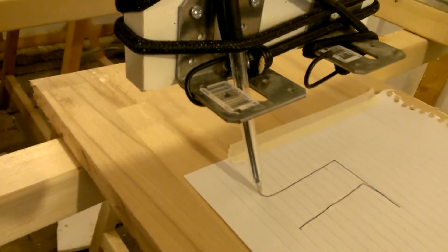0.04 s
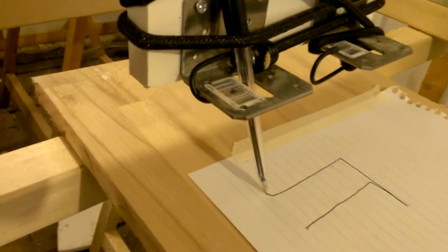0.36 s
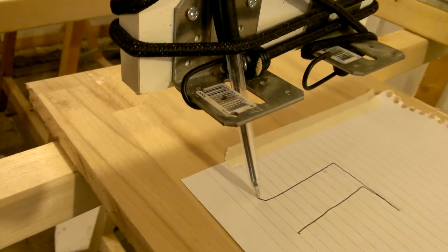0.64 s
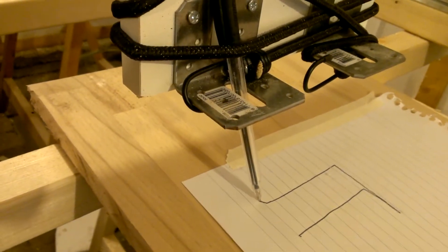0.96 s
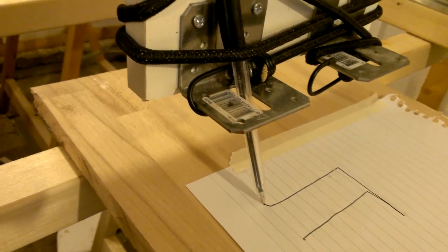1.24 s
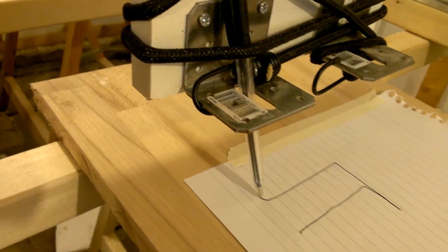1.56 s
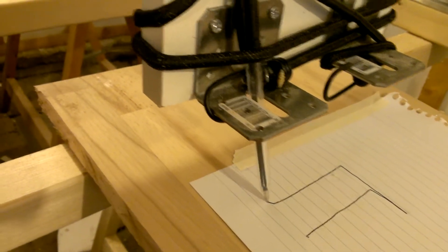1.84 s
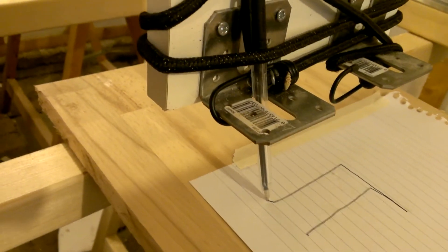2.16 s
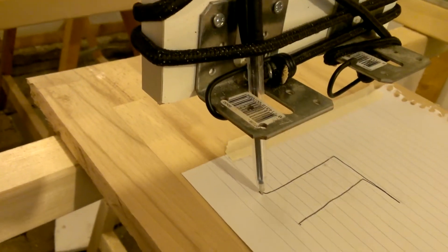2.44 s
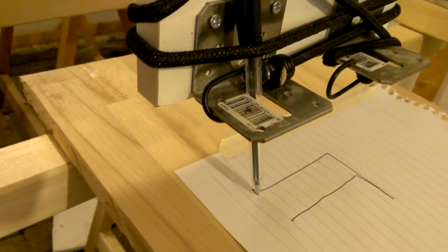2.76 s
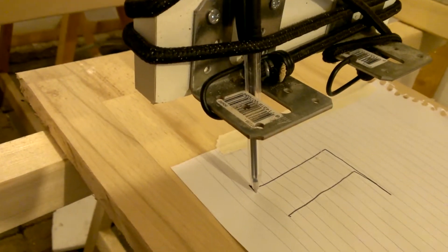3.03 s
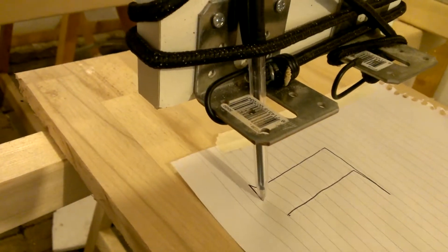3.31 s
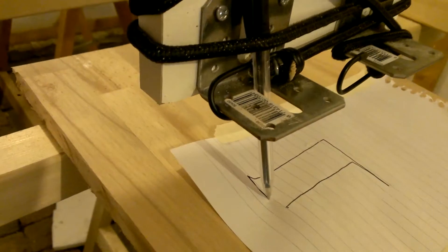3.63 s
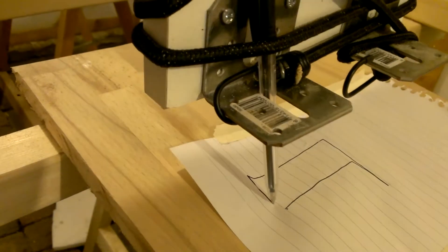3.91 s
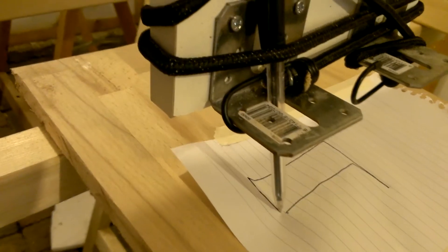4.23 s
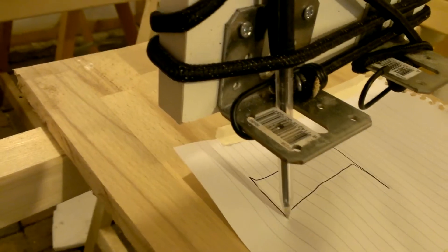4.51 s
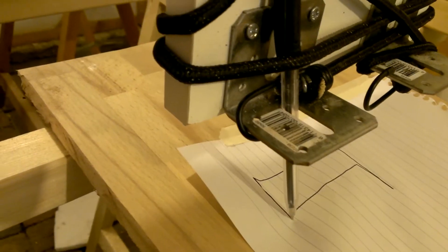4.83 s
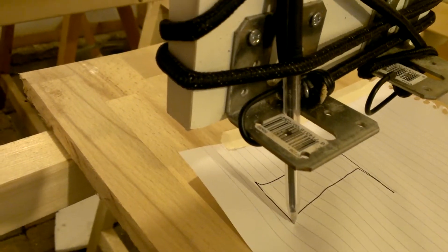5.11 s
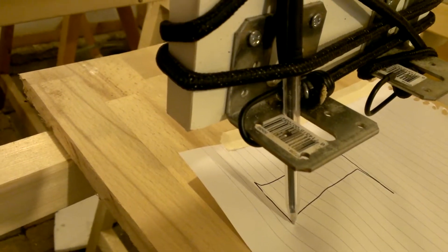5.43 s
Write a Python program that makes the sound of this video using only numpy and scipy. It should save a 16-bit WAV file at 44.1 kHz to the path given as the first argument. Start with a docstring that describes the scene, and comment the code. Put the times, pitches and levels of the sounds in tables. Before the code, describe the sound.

A small stepper motor drives a plotter on a wooden bench, heard from close up over faint room hiss. A short rattling stop and a pause come first, then two back-to-back runs of even, singing whir with belt noise, the frame juddering at each start and stop. One bright metallic snap rings out early in the second run. Afterwards a thin coil whine cuts off and the carriage bumps softly.

```python
"""In a workshop, close by, a homemade plotter on a wooden bench ends one stroke and draws two more. Its stepper
motor turns in tiny jumps: they shake the frame at each start and stop, and blend into a steady song at full
speed, over the rush of belt and bearings. A sharp snap rings out after the plotter reverses. At rest the
motor's coils whine until the current drops and the carriage (the part that carries the pen) settles with soft
bumps. Behind it all is the faint hiss of the room."""
import sys
import numpy as np
from scipy import signal
from scipy.fft import rfft, irfft
from scipy.io import wavfile

SR = 44100
rng = np.random.default_rng(int(sys.argv[2]) if len(sys.argv) > 2 else 0)


def digitize_waveform(pressure):
    """Quantize a signal to 16-bit integers and store it at the path in sys.argv[1].

    Rows of a 2-D input are taken as channels; values are limited to [-1, 1].
    """
    field = np.atleast_2d(pressure).T
    bounded = np.clip(field, -1, 1)
    quanta = np.round(bounded * 32767).astype(np.int16)
    wavfile.write(sys.argv[1], SR, quanta)


N = 250047
TIME = np.arange(N) / SR
FULL_SPEED, STEPS_PER_TURN = 824.66, 200   # speeds are in motor steps per second

# Pen strokes, the first already ending: start_s, brake_s, stop_s, shake_db, resting_whine_db
STROKES = [(-1, -.095, .072, -8, 1.5), (1.265, 2.885, 3.036, 0, 1), (3.04, 4.606, 4.808, 0, -3)]
# One moment per whole stroke when the motor's once-a-turn swell peaks; the rush rises around it: time_s
SWELL_MOMENTS = [1.5, 3.785]


def motor(speed, steps, shake_db, buzz_db=-45, full_speed_rush_db=-4.6, stagger_steps=2.1):
    """The motor sings once it is up to speed; belt and bearings rush, brighter as it goes faster."""
    # Noise of the belt and bearings: pitch_hz, level_db
    rush_spectrum = [(40, -20.5), (80, -19), (130, -8), (240, -1.5), (550, 0), (900, -4.5), (1400, -6),
                     (2100, -14), (3600, -17.5), (5000, -11.5), (6500, -18), (8500, -24.5), (12000, -30),
                     (16000, -33.5)]
    pace = speed / FULL_SPEED
    steady = np.clip(np.minimum(pace, lowpass(pace, hz=9, order=1)), 0, 1)
    rotor_steps = steps + stagger_steps * (1 - pace) * drift(250)   # it staggers below full speed
    turns = rotor_steps / STEPS_PER_TURN
    angle = shaft_angle(turns)
    load = 1 + .19 * np.cos(angle)
    hum = steady ** 6 * motor_tones(rotor_steps, angle)
    song = pace ** 5 * (case_tones(angle) + from_db(buzz_db) * load * microstep_buzz(turns))
    bright = noise(rush_spectrum)
    dull = lowpass(bright, hz=1600, order=1)
    rush = dull + (bright - dull) * (.41 + .59 * pace)
    rush_gain = rolling_gain(speed, shake_db) * from_db(full_speed_rush_db * steady) * load
    return hum + song + rush_gain * rush


def motor_tones(steps, angle, waver_rate=35, flutter=.33, belt_wander=.065):
    """The motor's pull ripples and makes tones; the changing load makes them swell and waver."""
    # Tones of the eight-step drive pattern:
    # harmonic, level_db, swell_once_a_turn, swell_twice_a_turn, waver_radians
    tones = [(1, -55, .1, -0.72, .4), (2, -42, .27, 0.54, 0.86), (3, -44.5, .3, 0.33, 0.43),
             (4, -42, 0.52, .1, 0.56), (5, -46.5, .1, .2, 1.1), (6, -54.5, .1, .1, 1.7),
             (7, -42.5, 0.3, -.6, .35), (8, -28.5, 0.041, 0, .11), (9, -46.5, .2, .1, .7),
             (10, -52, 0.17, -0.099, 1.4), (11, -59.5, 0.17, -0.2, 0.8), (14, -54.5, .3, 0.4, 1.3),
             (15, -49, .3, -0.1, .25), (16, -45, 0.6, -0.25, .12), (17, -51.5, .4, 0, .4)]
    # Tones of the belt at full speed: pitch_hz, level_db
    belt_tones = [(238, -53.5), (598, -54), (1216.4, -44), (1361.6, -55), (1384, -59), (1712, -59.5)]
    pattern_cycles = steps / 8
    each_turn, each_half_turn = np.cos(angle), np.cos(2 * angle)
    out = np.zeros(N)
    for harmonic, db, once, twice, waver in tones:
        unsteady = drift(waver_rate)
        swell = 1 + once * each_turn + twice * each_half_turn
        swell += flutter * waver * unsteady + .15 * drift(11)
        rocking = waver * (sine(angle / np.pi + rng.random()) / np.sqrt(2) + .83 * unsteady)
        tone = sine(harmonic * pattern_cycles + rng.random() + rocking / (2 * np.pi))
        out += from_db(db) * rms_one(swell) * tone
    for hz, db in belt_tones:
        out += from_db(db) * sine(hz * steps / FULL_SPEED + belt_wander * drift(waver_rate))
    return out


def case_tones(angle, boost_db=1.5, flutter=.2, wander=.05, coil_ring_hz=9400):
    """The motor's case rings at overtones of the full-speed drive pattern."""
    # Ringing of the case, each row moved to the nearest overtone: rough_pitch_hz, relative_db
    tones = [(2471, -58.5), (2885, -63), (3300, -69.5), (3505, -70.5), (3919, -59.5), (4328, -50),
             (4436, -59.5), (4533, -66), (4640, -54.5), (4743, -49.5), (5050, -53.5), (5157, -52),
             (5464, -58), (5959, -67.5), (6083, -61.5), (6185, -67.5), (6907, -64), (7730, -67.5),
             (8554, -69.5), (8662, -71), (9281, -68.5), (9383, -69.5), (9485, -68.5), (9582, -71),
             (10207, -64.5), (11030, -52.5), (11133, -66.5), (11854, -78), (13916, -81), (14739, -74)]
    pattern_hz = FULL_SPEED / 8
    wobbles = [drift(11) for _ in range(7)]
    once_a_turn = .4 * np.cos(angle) - .3
    twice_a_turn = .54 * (1 + np.cos(2 * angle))
    out = np.zeros(N)
    for k, (hz, db) in enumerate(tones):
        overtone_hz = np.round(hz / pattern_hz) * pattern_hz
        tone = sine(overtone_hz * TIME + rng.random() + wander * wobbles[(k + 2) % 7])
        # low overtones swell; those near the coils' own ringing pitch throb twice as fast
        swell = once_a_turn if hz < 3600 else twice_a_turn if abs(hz - coil_ring_hz) < 300 else 0
        out += from_db(db + boost_db) * tone * (1 + swell + flutter * wobbles[k % 7])
    return out


def microstep_buzz(turns, side_tone_db=-13, uneven_db=3, size=65536):
    """Each step is split into finer ones that buzz; the turning shaft adds tones beside each overtone."""
    # Tone colour of the buzz at full speed: pitch_hz, level_db
    buzz_spectrum = [(500, 1), (1100, 8.5), (2000, -4), (3200, -1), (3700, -3.5), (4800, -8), (6200, 0.5),
                     (7500, -20), (9000, -17), (10000, -23.5), (11200, -19.5), (12000, -29), (16000, -28)]
    cycles_per_turn = np.arange(size // 16)
    off_overtone = np.abs((cycles_per_turn + 12) % 25 - 12)   # the pattern repeats 25 times a turn
    gains = gain_at(buzz_spectrum, cycles_per_turn * FULL_SPEED / STEPS_PER_TURN)
    gains *= from_db(side_tone_db * np.sqrt(off_overtone) + uneven_db * rng.standard_normal(len(gains)))
    phases = np.exp(2j * np.pi * rng.random(len(gains)))
    one_turn = irfft(gains * (cycles_per_turn > 110) * phases, size)
    return np.interp(turns % 1 * size, np.arange(size), rms_one(one_turn))


def drive(creep_speed=122, speed_up_per_s=8400, slow_down_per_s=7100, lead_in_s=.027, ease_s=.014):
    """Speed and shaking level: each stroke creeps off, speeds up, holds, brakes and creeps to a stop."""
    hold_s, fade_db_per_s = .035, 140   # after braking, the shaking holds briefly and then fades
    speed, shake_db = np.zeros(N), np.zeros(N)
    for start, brake, stop, db, _ in STROKES:
        until_creep_s = brake + (FULL_SPEED - creep_speed) / slow_down_per_s - TIME
        rising = speed_up_per_s * np.maximum(TIME - start - lead_in_s, 0)
        falling = slow_down_per_s * ease_s * np.logaddexp(0, until_creep_s / ease_s)
        moving = (TIME >= start) & (TIME < stop)
        speed += moving * np.minimum(creep_speed + np.minimum(rising, falling), FULL_SPEED)
        shake_db += moving * (db - fade_db_per_s * np.maximum(-until_creep_s - hold_s, 0))
    return speed, shake_db


def shaft_angle(turns):
    """The shaft's angle in radians, counted from the swell moment of each whole stroke."""
    first, second = np.interp(SWELL_MOMENTS, TIME, turns)
    return 2 * np.pi * (turns - np.where(TIME < STROKES[-1][0], first, second))


def rolling_gain(speed, shake_db, roll_db=-35.5, rotor_hz=200, shudder_db=5, rise_db=3, rise_s=.14):
    """The rush rises at the swell moments, and when steps match the rotor's wobble and it shudders."""
    octaves_away = np.log2((speed + 1e-9) / rotor_hz)
    shudder = np.exp(-(octaves_away / .7) ** 2)
    rise = sum(np.exp(-((TIME - s) / rise_s) ** 2) for s in SWELL_MOMENTS)
    level_db = roll_db + shake_db + shudder_db * shudder + rise_db * rise
    speed_gain = (speed > 0) * (speed / FULL_SPEED + 1e-9) ** .12   # a little louder when faster
    return limit_fall(from_db(level_db) * speed_gain, db_per_s=600)


def judder(speed, steps, shake_db, jolt_db=-29, pull_db=3.5, fast_db=-4, uneven_db=3, rattle_db=-1):
    """Below full speed, uneven steps and knocks make the frame ring and rattle, and the motor growls."""
    # Ringing of the frame and bench: pitch_hz, level_db, ring_s
    frame_modes = [(183, -20, .09), (367, -7, .045), (362.3, -11, 0.2), (440, -7, .02), (527, -8, .04),
                   (505, -13, .18), (640, -11.5, 0.042), (820, -7.5, .025), (1080, -29, 0.022),
                   (1280, -19, .03), (1560, -34, .02), (1940, -33.5, .02)]
    # How loud the growl is at each speed: steps_per_s, level_db
    growl_levels = [(100, -57.5), (270, -37.5), (350, -24.5), (480, -30), (600, -40), (760, -38.5),
                    (824, -40)]
    pace = speed / FULL_SPEED
    slow = np.clip((FULL_SPEED - speed) / 60, 0, 1)
    shaking = np.maximum(slow, lowpass(slow, hz=6, order=1)) * (speed > 0)
    rotor_steps = steps + .55 * pace * drift(300)
    new_step = np.diff(np.floor(np.maximum.accumulate(rotor_steps)), prepend=0) > 0
    pulling_away = sum((TIME >= start) & (TIME < brake) for start, brake, *_ in STROKES) * (1 - pace)
    step_db = jolt_db + shake_db + pull_db * pulling_away + fast_db * pace
    jolts = new_step * shaking * from_db(step_db + uneven_db * rng.standard_normal(N))
    force = jolts + knocks()
    rattle = lowpass(signal.fftconvolve(force, dying_noise(ring_s=.025))[:N], hz=2200)
    speeding_up = lowpass(np.gradient(speed) > 0, hz=100)
    growl_db = np.interp(speed, *np.transpose(growl_levels)) - 5 * speeding_up   # louder when braking
    growl = shaking * from_db(growl_db) * sine(rotor_steps) * (1 + .8 * drift(200))
    return ring(force, frame_modes) + from_db(rattle_db) * rattle + growl


def knocks(gap_s=.0058, soft_hz=2800):
    """Slack in the drive knocks softly in short, fading runs, once for each wobble of the rotor."""
    # Runs of knocks: start_s, level_db, length_s
    runs = [(.001, -25, .011), (1.2985, -14.5, .016), (2.9802, -13.5, .012), (3.067, -12.5, .016),
            (3.1015, -23, .005), (4.699, -16.5, .026)]
    force = np.zeros(N)
    for start, db, length in runs:
        delays = np.arange(0, length, gap_s)
        force += strikes([(start + t, db + 20 * np.log10(1 - (t / length) ** 2 + 1e-9)) for t in delays])
    return lowpass(force, soft_hz)


def snap(tick_db=6, crack_db=16, tail_db=17, ring_db=-5.5):
    """A sharp snap: a bright tick, a crack, ringing, and a tail from the parts around it."""
    # The snap and its rattle: start_s, level_db
    hits = [(3.1726, -8), (3.1748, -18.5), (3.287, -34)]
    # Ringing of the snapping part: pitch_hz, level_db, ring_s
    snap_modes = [(404, -13, 0.12), (1000, -13.5, 0.073), (1350, -12, 0.024), (1680, -8.5, 0.053),
                  (2310, -9, 0.076), (2751, -12.5, 0.13), (3990, -10.5, .03), (3980, 2, 0.012),
                  (4926, -4, 0.044), (5351, -10, .05), (6120, -6.5, .07), (7200, -16, .05)]
    force = strikes(hits)
    tick = from_db(tick_db) * dying_noise(ring_s=.0027)
    crack = from_db(crack_db) * dying_noise(ring_s=.022)
    tail = from_db(tail_db) * dying_noise(ring_s=.22)
    body = signal.sosfilt(signal.butter(3, [1150, 7000], "band", fs=SR, output="sos"), crack + tail)
    return signal.fftconvolve(force, tick + body)[:N] + from_db(ring_db) * ring(force, snap_modes)


def coils(speed, hiss_db=-61, jitter=.35, full_speed_db=-19, flare_s=.008):
    """Current switched rapidly on and off makes the coils whine, mostly while standing or creeping."""
    # Tones of the whine: pitch_hz, level_db
    whine_tones = [(6885, -82), (8699, -77), (9206, -62), (9421, -74), (9634, -75), (11024, -70.5)]
    # Hiss around those tones: pitch_hz, level_db
    hiss_spectrum = [(3000, -25), (6000, -17.5), (8000, -14.5), (8900, -12.5), (9150, -5.5), (9400, 0),
                     (9650, -5), (9850, -14), (10400, -21), (11050, -13), (11500, -25.5), (16000, -25)]
    # Brief flares of the whine at low speed: peak_s, level_db
    flare_peaks = [(1.269, 8), (2.985, 18), (3.053, 11)]
    tones = sum(from_db(db) * sine(hz * TIME + jitter * drift(60) / (2 * np.pi))
                for hz, db in whine_tones)
    flares = sum(from_db(db) * np.exp(-((TIME - s) / flare_s) ** 2) for s, db in flare_peaks)
    gain = limit_fall(whine_gain(), db_per_s=550) + flares
    gain *= from_db(full_speed_db * speed / FULL_SPEED)
    return gain * (tones + from_db(hiss_db) * noise(hiss_spectrum))


def whine_gain(moving_db=3, idle_delay_s=.352):
    """The whine is on from the start of a stroke until the current drops, a moment after the stop."""
    gain = np.zeros(N)
    for start, _, stop, _, rest_db in STROKES:
        gain[(TIME >= start) & (TIME < stop)] = from_db(moving_db)
        gain[(TIME >= stop) & (TIME < stop + idle_delay_s)] = from_db(rest_db)
    return gain


def settle(bump_db=-50.5, gap_s=.012, peak_s=.027, slope_db_per_s=130, count=6):
    """When the current drops the motor lets go; the carriage sinks back in bumps that swell and die."""
    # Ringing of the carriage: pitch_hz, level_db, ring_s
    carriage_modes = [(172.7, 1, 0.22), (196, -7, 0.16), (256.6, 7, 0.082), (392, 7.5, 0.027),
                      (603, -2, 0.061), (763, -6.5, .07), (974, -12, .06), (1280, -10, 0.052)]
    powered = whine_gain() > 0
    bumps = []
    for drop_s in TIME[1:][powered[:-1] & ~powered[1:]]:
        gaps = gap_s * (1 + .3 * rng.uniform(-1, 1, count))
        delays = np.cumsum(gaps) - gaps[0]
        bumps += [(drop_s + t, bump_db - slope_db_per_s * abs(t - peak_s)) for t in delays]
    return ring(lowpass(strikes(bumps), hz=1100, order=3), carriage_modes)


def workshop(sound, echo_db=-13, ring_s=.3, wall_hz=4000):
    """The walls add a short, dull echo that arrives just after the direct sound."""
    tail = np.concatenate([np.zeros(SR // 150), lowpass(dying_noise(ring_s), wall_hz)])
    return sound + from_db(echo_db) * signal.fftconvolve(sound, tail)[:N]


def room_air(level_db=-66):
    """The still air of the workshop is a faint, even hiss."""
    # Tone colour of the air: pitch_hz, level_db
    air_spectrum = [(30, -12.5), (70, -26.5), (150, -13), (230, -2.5), (400, -8), (600, -13), (1000, -13.5),
                    (1200, -18.5), (2500, -20.5), (4500, -16), (7000, -22.5), (16000, -21.5)]
    return from_db(level_db) * noise(air_spectrum)


def from_db(db):
    """Turn decibels into a factor to multiply by."""
    return 10 ** (np.asarray(db) / 20)


def rms_one(x):
    """Scale a signal so that its average strength (rms) is 1."""
    return x / np.sqrt(np.mean(np.abs(x) ** 2) + 1e-20)


def sine(cycles):
    """A pure tone of strength 1, from a running count of its cycles."""
    return np.sqrt(2) * np.sin((2 * np.pi * (cycles - np.floor(cycles))).astype(np.float32))


def gain_at(spectrum, hz):
    """The gain at any pitch, read between rows of pitch_hz, level_db."""
    pitches, db = np.transpose(spectrum)
    return from_db(np.interp(np.log(hz + 1e-9), np.log(pitches), db))


def noise(spectrum):
    """Noise of strength 1 with the given tone colour."""
    hz = np.arange(N // 2 + 1) * SR / N
    return rms_one(irfft(rfft(rng.standard_normal(N)) * gain_at(spectrum, hz), N))


def dying_noise(ring_s):
    """Half a second of noise, total energy 1, that falls 60 dB in ring_s."""
    t = TIME[:SR // 2]
    tail = rng.standard_normal(len(t)) * from_db(-60 * t / ring_s)
    return tail / np.linalg.norm(tail)


def drift(rate):
    """A random wander of strength 1 that heads for a new value `rate` times a second."""
    targets = rng.standard_normal(1024)
    return rms_one(np.interp(TIME * rate, np.arange(len(targets)), targets))


def strikes(rows):
    """One click for each row of start_s, level_db."""
    start_s, db = np.transpose(rows)
    clicks = np.zeros(N)
    clicks[np.clip(np.round(start_s * SR).astype(int), 0, N - 1)] = from_db(db)
    return clicks


def ring(force, modes):
    """A struck object rings at its own pitches (modes), each falling 60 dB in its ring_s."""
    out = np.zeros(N)
    for hz, db, ring_s in modes:
        decay, phase_step = from_db(-60 / (ring_s * SR)), 2 * np.pi * hz / SR
        feedback = [1, -2 * decay * np.cos(phase_step), decay * decay]
        out += signal.lfilter([0, from_db(db) * np.sin(phase_step)], feedback, force + 1e-18)
    return out


def limit_fall(gain, db_per_s):
    """Let a gain rise at once but fall no faster than db_per_s."""
    fall = db_per_s * TIME
    return from_db(np.maximum.accumulate(20 * np.log10(gain + 1e-9) + fall) - fall)


def lowpass(x, hz, order=2):
    """Soften everything above hz."""
    return signal.sosfilt(signal.butter(order, hz, fs=SR, output="sos"), x + 1e-18)


def highpass(x, hz, order=2):
    """Thin out everything below hz."""
    return signal.sosfilt(signal.butter(order, hz, "high", fs=SR, output="sos"), x)


def scene():
    """The motor, the shaken frame with its echo, the coils and the quiet room, in one channel."""
    speed, shake_db = drive()
    steps = np.cumsum(speed) / SR
    blows = judder(speed, steps, shake_db) + snap() + settle()
    blows = highpass(blows, hz=153, order=3)   # the small frame gives off little bass
    return (motor(speed, steps, shake_db) + workshop(blows) + coils(speed) + room_air())[None]


def record(dry, peak_limit=.48, bass_cut_hz=65, treble_cut_hz=15750):
    """A small microphone rounds the highest peaks and loses the deep bass and the very top."""
    rounded = dry / (1 + (dry / peak_limit) ** 6) ** (1 / 6)
    thin = highpass(rounded, bass_cut_hz)
    return signal.sosfilt(signal.ellip(12, .1, 80, treble_cut_hz, fs=SR, output="sos"), thin)


dry = scene()
out = record(dry)
digitize_waveform(out)
```